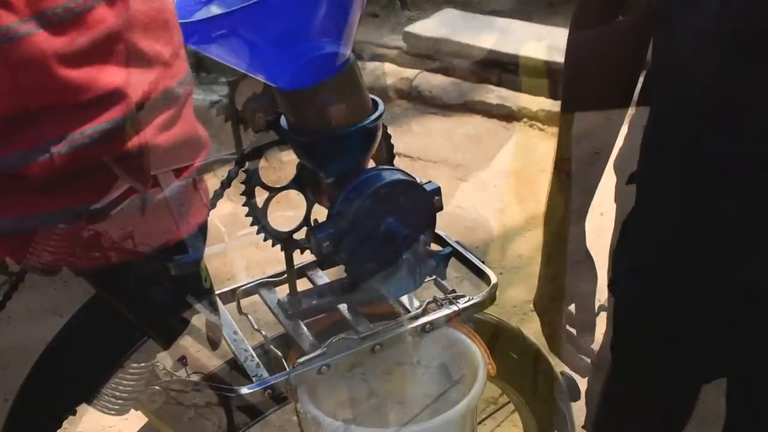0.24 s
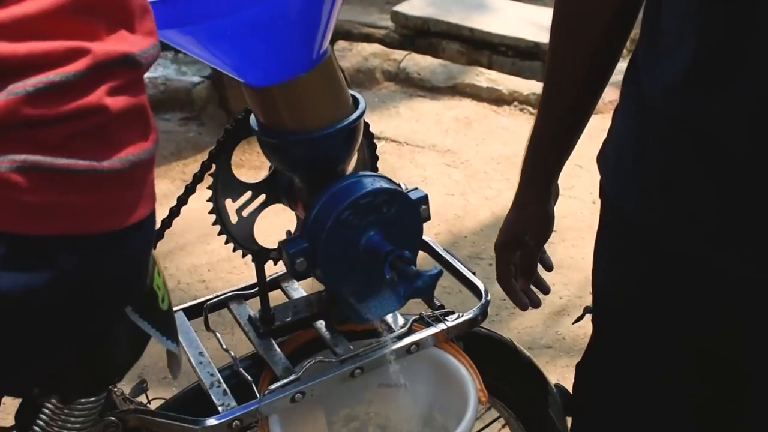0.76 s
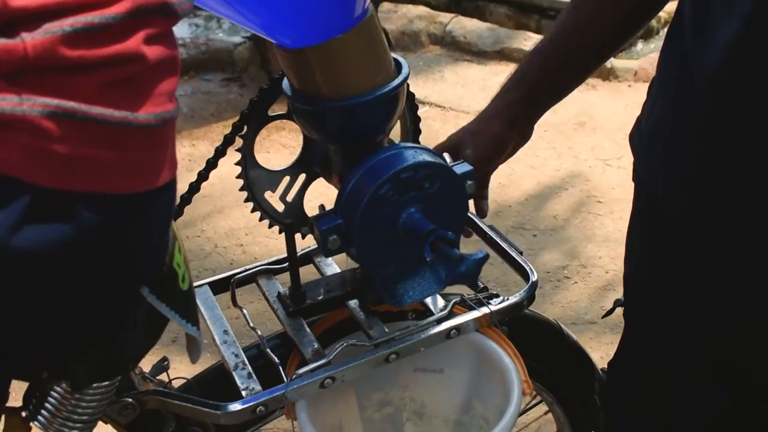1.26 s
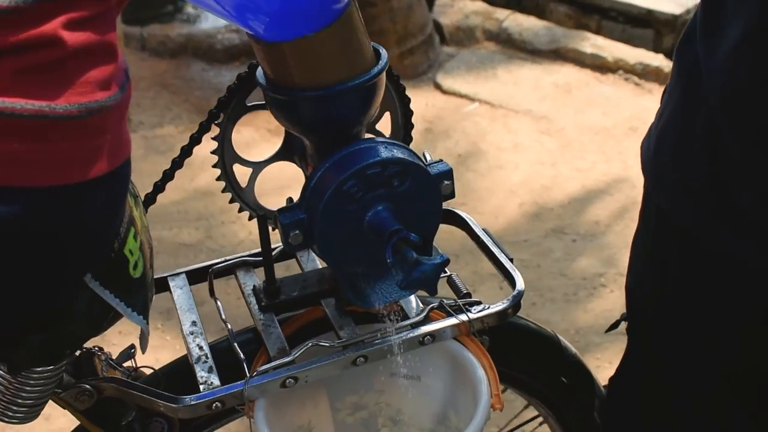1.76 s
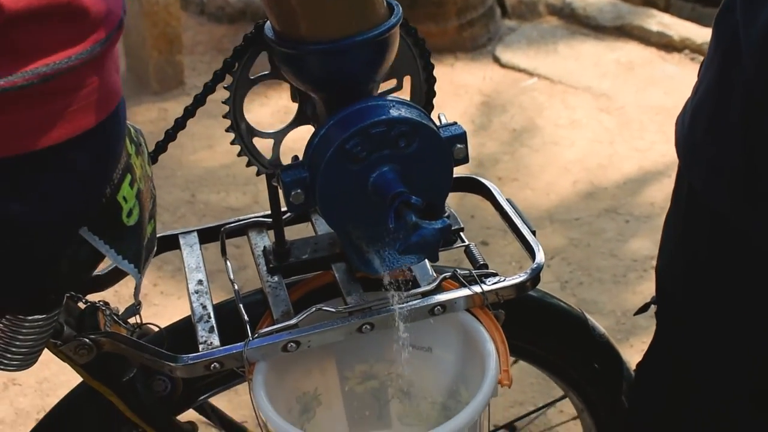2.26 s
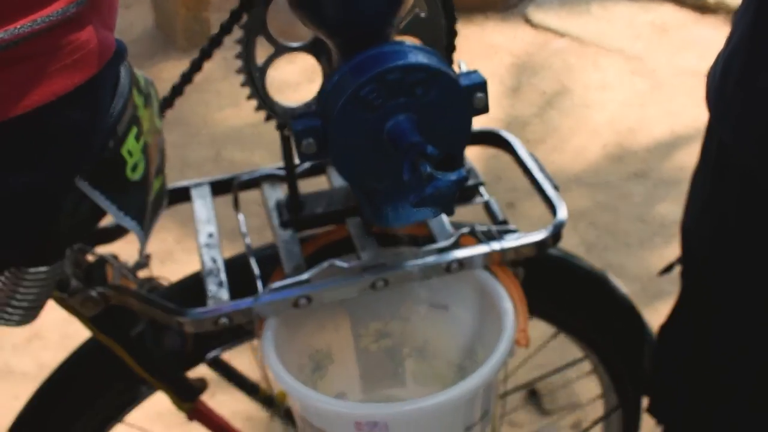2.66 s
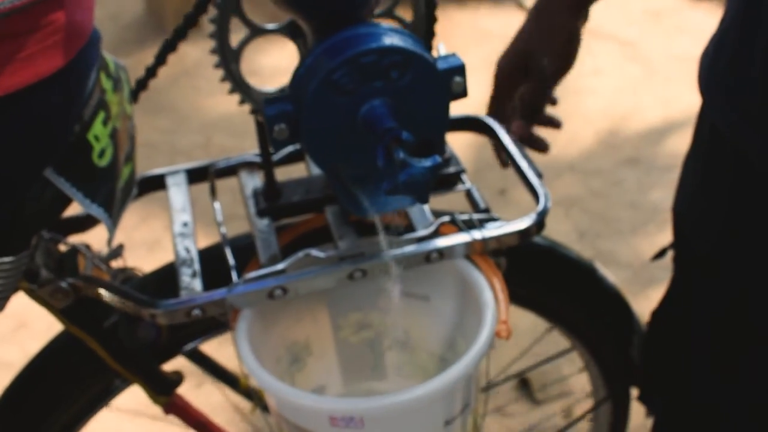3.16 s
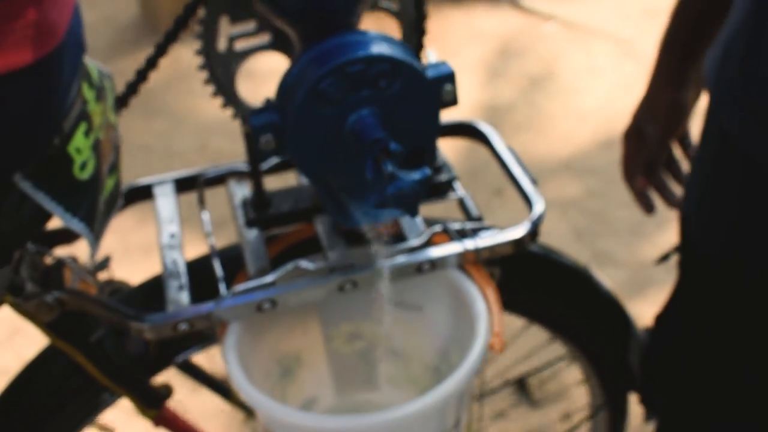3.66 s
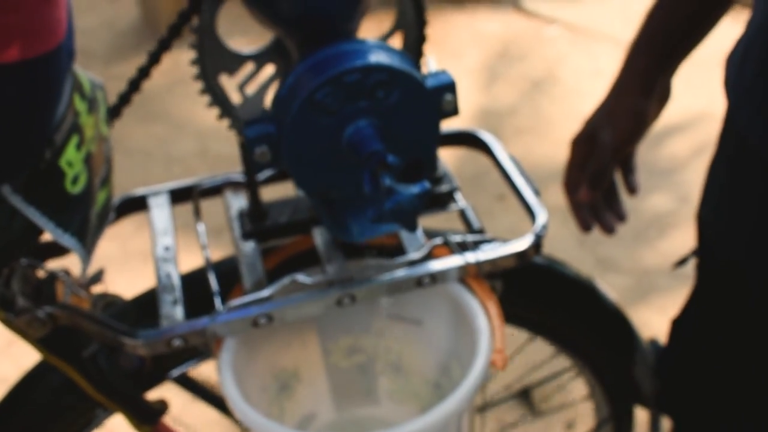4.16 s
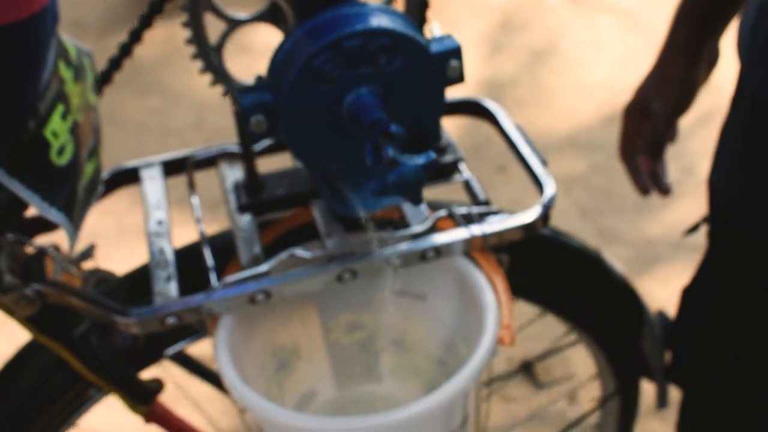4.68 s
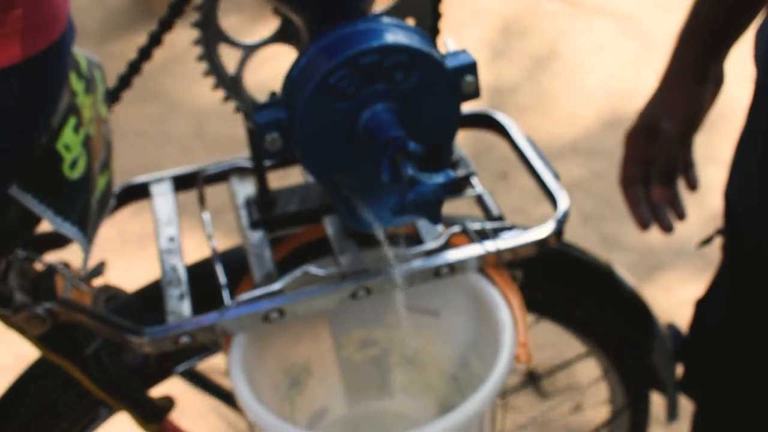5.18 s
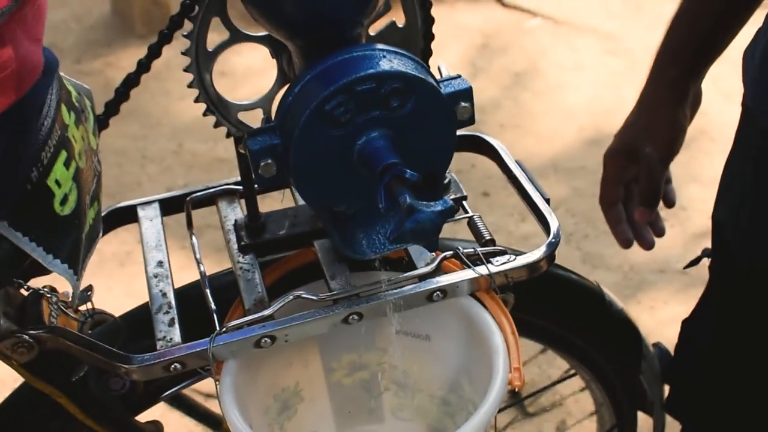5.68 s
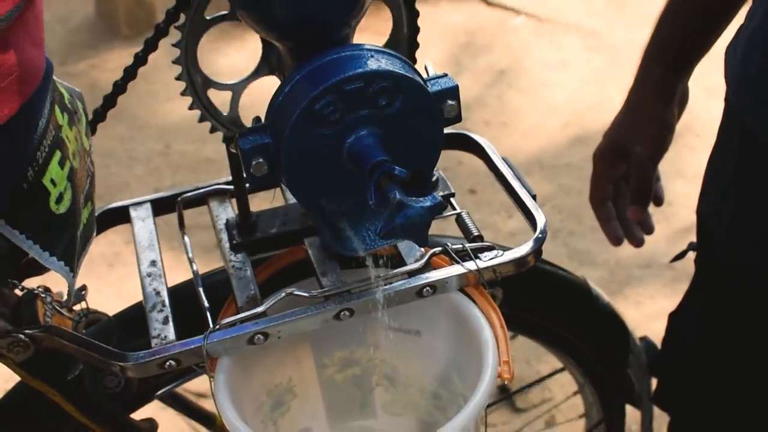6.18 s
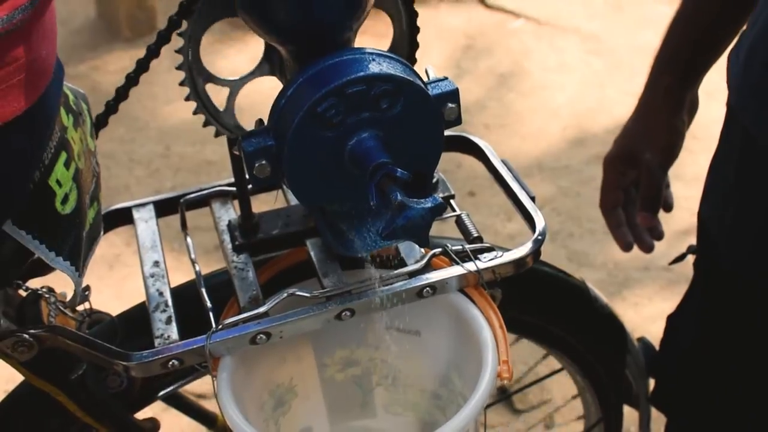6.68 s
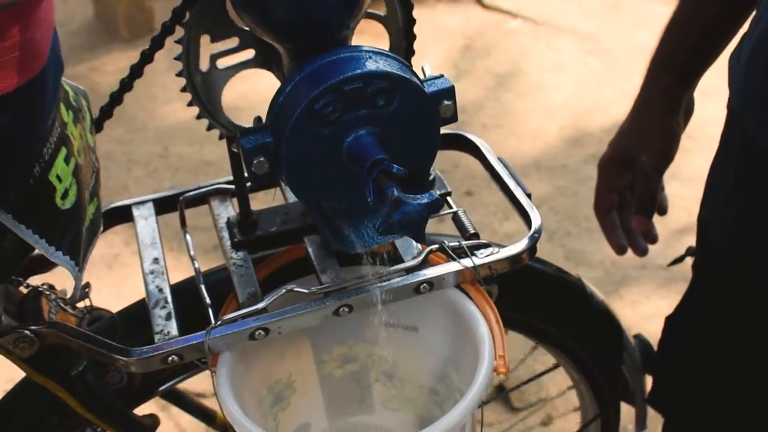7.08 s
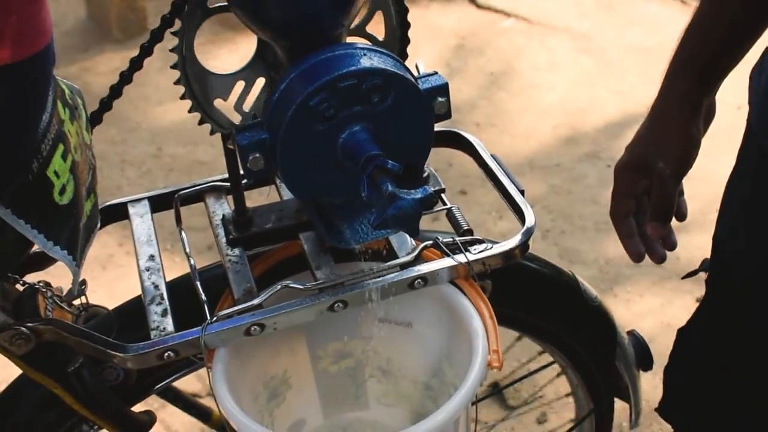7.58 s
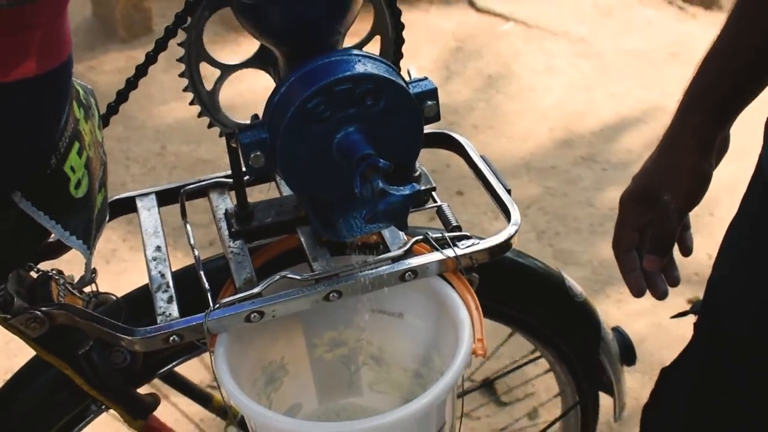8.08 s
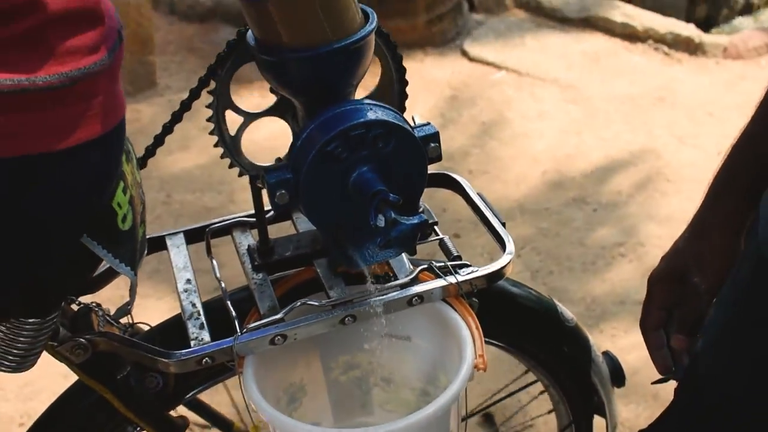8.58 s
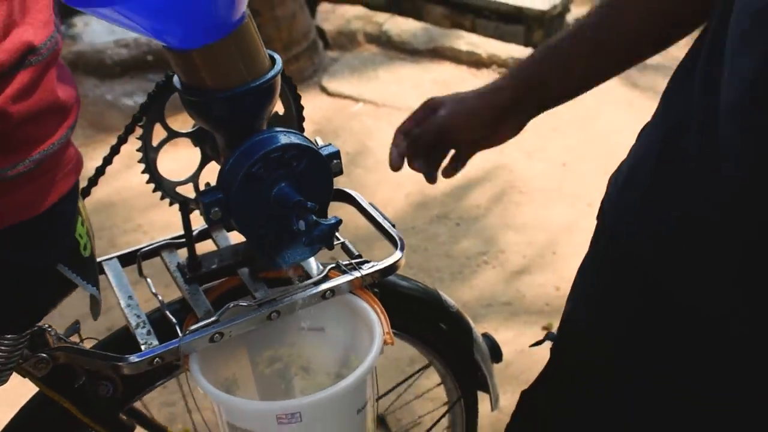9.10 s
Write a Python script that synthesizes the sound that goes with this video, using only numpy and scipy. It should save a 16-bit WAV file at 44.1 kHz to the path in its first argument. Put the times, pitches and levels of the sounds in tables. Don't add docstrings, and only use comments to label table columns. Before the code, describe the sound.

Harsh gritty iron grinding and ringing cracks surge and sag with each turn of the mill, chain ticking and bits knocking in a plastic bucket.

```python
import sys
import numpy as np
from scipy import signal
from scipy.fft import rfft, irfft
from scipy.io import wavfile
from scipy.ndimage import uniform_filter1d, minimum_filter1d, map_coordinates

SR = 44100
rng = np.random.default_rng(int(sys.argv[2]) if len(sys.argv) > 2 else 0)


def gain_from_decibels(decibels):
    exponent = np.asarray(decibels, float) / 20
    return 10 ** exponent


def unload_wav(signal):
    wavfile.write(
        sys.argv[1],
        SR,
        np.round(np.clip(np.atleast_2d(signal).T, -1, 1) * 32767).astype(np.int16),
    )


N = 412114
STEP = 4

# time in seconds, level in dB, casting boom in dB, grit brightness in dB.
EFFORT = [(0, -18, -2, 0), (0.25, -15.5, 0, -0.5), (0.75, -16, -1, 2), (1.3, -20.5, -0.5, -1),
          (1.55, -13.5, -0.5, -3), (2.1, -15.5, 1, -3), (2.39, -15, 0, -3), (2.99, -14, -1, 1.5),
          (3.6, -13.5, 1.5, -1), (3.92, -15, -2.5, 0.5), (4.6, -17.5, 1, -2), (5.2, -13.5, 1, -4),
          (6.1, -20.5, 0.5, 1.5), (6.6, -15, 1.5, 0), (7.4, -17, -1, -1.5), (7.8, -16.5, -2.5, -3.5),
          (8.7, -17.5, -0.5, -1.5), (9.34, -21, 0, 2)]
# start in seconds, fall in seconds, hold in seconds, rise in seconds, depth in dB.
LULLS = [(0.0, 0.038, 0.13, .03, 6.5), (0.79, .22, 0.16, .04, 13), (1.59, 0.096, .03, 0.12, 5.5),
         (2.414, 0.19, .06, .28, 13), (3.12, 0.13, 0.035, 0.024, 4), (3.95, 0.1, .16, 0.078, 15.5),
         (4.264, 0.025, .03, .03, 5), (5.36, 0.16, .03, 0.058, 2.5), (5.522, 0.062, 0.12, .16, 14.5),
         (6.433, .05, .02, 0.13, 2.5), (7.456, .11, 0.017, 0.088, 10), (7.957, 0.034, 0.041, 0.23, 5.5),
         (8.798, 0.24, 0.054, .05, 3.5), (9.081, 0.034, 0.078, 0.083, 12.5)]
# time in seconds, level
# in dB, boom in dB.
KERNEL_SPLITS = [(0.095, -11, -6), (0.2615, -20, -14), (2.2869, -3.5, 1), (2.3834, -3.5, -19),
                 (2.6729, -6, -3), (2.8663, -3, -5), (3.306, -1, -6), (3.4418, -3, 0), (3.4723, 0, -13),
                 (3.6342, 0, -2), (3.6837, -1, -2), (3.8322, -8, 5), (4.2649, -2.5, -4), (4.558, -3, -5),
                 (4.8588, -3, 4), (4.9618, -6, -3), (5.0363, -12, -9), (5.2051, -3, -18), (5.2267, 0.5, 5),
                 (5.389, -4, 5), (5.9811, -1.5, -0.5), (5.9953, -1.5, 1), (6.2389, -1.5, 0.5),
                 (6.3256, 1, -0.5), (6.8287, -2, 3), (7.0395, -4, -1), (7.3729, -3, -1.5), (7.732, -5.5, 1),
                 (7.9809, -6.5, 8.5), (8.5885, -1, 2),
                 (0.689, -3, -9), (0.9233, -10, -4.5), (1.1048, -12.5, -16), (1.1952, -15, 1), (1.2593, -14, 10),
         (1.522, -12, 15), (1.6095, -4, 2), (1.7594, -5.5, 1), (1.795, -8, 3), (2.7358, -11, 6),
         (2.8162, -5.5, -3), (4.0074, -9, -0.5), (4.0842, -14, -10), (4.2152, -11, -11), (4.3493, -9, 6),
         (4.4062, -10, 4.5), (4.5392, -3, -6), (5.53, -10, -4), (5.8587, -14, 1), (6.075, -7.5, -7),
         (6.1385, -9, 1.5), (6.2731, -8, 0), (6.5742, -9, -16), (7.1574, -7, 3.5), (7.6244, -6.5, -9),
         (8.1924, -4, -7), (8.242, -6, -6), (8.348, -5.5, -15), (9.0809, -14, -8), (9.218, -7.5, -7),
                 (2.1436, -9, 6), (2.2785, -10, -5), (2.4249, -11, -2), (2.4388, -5, -15), (3.5624, -12, 8),
              (3.6728, -4, 1.5), (3.8133, -7, 1), (3.913, -4, -2), (3.9298, -4.5, 1), (4.2499, -7, -2),
              (4.383, -11, 4), (4.7164, -6.5, 1), (4.814, -7, 8), (5.2196, -3, -3), (5.4383, -9.5, -1),
              (5.7834, -15, -3), (6.6022, -13, -6), (7.3924, -3.5, 2.5), (7.4456, -8, 2.5),
              (7.6637, -13.5, 0), (7.8576, -9, 8), (7.881, -10, 8), (7.9058, -8, 8), (8.258, -10, -5),
              (8.4613, -12.5, 8), (8.7291, -5, -2), (8.7842, -9, 1.5), (8.9758, -8, 2), (9.1132, -14, 5),
              (9.282, -11, -8)]
# time in seconds, level in dB, boom in dB.
CRUMBLES = [(0.1459, -1.5, -7), (0.7617, -9, -4), (0.7795, 6, -10), (1.2068, -9, -1), (1.2327, -14.5, -9),
            (1.298, -11.5, -5), (1.3528, -9.5, 3.5), (1.4539, -8.5, 1), (2.2012, -6.5, 1.5),
            (2.7824, -6, -2.5), (3.1358, -11, -9), (3.2923, -3, 3), (3.3263, -6, 1), (3.3619, -3.5, -7),
            (3.3974, -4.5, -6), (3.6195, -5, 2.5), (3.9006, -6, -4), (4.2344, -6.5, 1.5),
            (4.4863, -4.5, -1), (4.9486, -6.5, -2), (5.8482, -9, -4), (6.149, -7.5, -2.5), (6.311, -5, -10),
            (6.3389, -3, -2), (6.7084, -7.5, 1), (7.2261, -7, -4), (7.7822, -3.5, -6), (7.9468, -4.5, -2.5),
            (8.7032, -7, 2.5), (8.9332, -6.5, -6)]
# pitch in Hz, width in Hz, level over the burr spectrum in dB.
IRON = np.array([(279, 69, -1.5), (429, 19, -5.0), (610, 310, -1), (860, 165, 1.5), (1120, 98, 2.5),
        (1386, 29, -0.5), (1507, 53, 4.0), (1777, 363, 5.0), (2197, 255, 0.5), (2391, 144, 6.5),
        (2700, 354, 0.5), (3180, 260, -2.5), (3688, 265, 0.5), (4480, 456, 3.5), (4806, 108, 3.5),
        (5162, 220, 3.0), (5550, 360, 1), (6100, 140, 1.5), (6543, 376, 6.0), (7055, 147, 6.5),
        (7720, 245, 3), (8800, 900, -3.0), (9834, 450, 3.5), (10750, 330, 5), (12170, 910, 2.5),
        (14240, 360, 5.5)])
# frequency in Hz, level in dB per Hz.
BURR_TONE = [(150, -59.5), (280, -21), (600, -15.5), (1220, -13), (1320, -6), (2800, -7), (5000, -4),
             (7500, -13.5), (10000, -10.5), (12500, -17.5), (14500, -15.5), (15690, -23), (15720, -99)]
# time in seconds, level in dB.
CHATTER = [(6.708, 0), (6.781, -1), (6.806, -1), (6.829, -2), (6.868, -7), (6.94, -3)]
# time in seconds, level in dB.
OPENING_HITS = [(0.0116, -10), (0.0254, -18), (0.0605, -12.5), (0.0664, -15), (0.0784, -16), (0.087, -14),
                (0.0948, -8), (0.127, -11), (0.1471, -12), (0.1727, -5.5), (0.175, -2)]
# time in seconds, peak in dB, pitch in Hz.
KNOCKS = [(0.146, -18.5, 523), (3.294, -14, 587), (3.362, -18.5, 420), (3.515, -17, 665),
          (3.612, -16.5, 580), (3.75, -22, 638), (4.352, -21, 647), (4.376, -24, 549), (4.628, -15, 626),
          (4.746, -22, 670), (4.772, -19, 627), (4.804, -16, 630), (5.524, -22, 610), (6.079, -18.5, 630),
          (6.637, -25, 606), (6.963, -20.5, 614), (7.175, -23, 606), (7.233, -23, 603), (8.335, -25, 550),
          (8.563, -23, 711)]
# pitch in Hz, width in Hz, level in dB.
BUCKET_MODES = [
    (299, 72, 6.5),
    (420, 60, -2),
    (618, 105, 2.5),
]
# time in seconds, pitch in Hz, level in dB.
SQUEAK = [
    (8.2, 780, -60),
    (8.22, 770, -45),
    (8.255, 730, -35),
    (8.29, 650, -59),
]
# time in seconds, peak in dB.
THUMPS = [(0.78, -30), (3.293, -46), (3.442, -48), (3.562, -50), (4.814, -52), (5.205, -46), (5.981, -46),
          (6.326, -44), (6.829, -48), (8.589, -50)]
# frequency in Hz, level in dB per Hz.
YARD_TONE = [(20, -38), (90, -36), (180, -15.5), (450, -16.5), (600, -1), (1000, -3.5), (1500, -3),
             (2500, -6.5), (5000, -18.5), (9000, -13), (15680, -48), (15720, -86)]

MODE_HZ = np.transpose(IRON)[0][:, None]
MODE_INDEX = np.arange(len(IRON))[:, None]
RACK = MODE_HZ < 1250
BOOMY = abs(MODE_HZ - 2100) < 850
BRIGHT = MODE_HZ > 8200
TIP = MODE_HZ > 14000
PLATE = np.isin(MODE_INDEX, [5, 6])
OPENING_MODES = np.isin(MODE_INDEX, [10, 12])


def unit(x):
    return x / np.sqrt(np.mean(x ** 2) + 1e-20)


def along(points, hz):
    f, v = np.transpose(points)
    return np.interp(np.log(hz + 1), np.log(f + 1), v)


def wobble(rate, step=1):
    knots = rng.standard_normal(int(N * rate / SR) + 4)
    return map_coordinates(knots, [np.arange(0, N, step) * rate / SR])


def causal(x, gain):
    size = 8192
    cepstrum = irfft(np.log(gain(np.fft.rfftfreq(size, 1 / SR)) + 1e-6), size)
    cepstrum[..., 1:size // 2] *= 2
    cepstrum[..., size // 2 + 1:] = 0
    impulse = irfft(np.exp(rfft(cepstrum)), size)
    return signal.oaconvolve(x, impulse, axes=-1)[..., :N]


def resonate(x, hz, width):
    return signal.lfilter(*signal.iirpeak(hz, hz / width, SR), x)


def bursts(times, gains, t60, rise):
    rate, size = SR / STEP, -(-N // STEP)
    at = np.clip((times * rate).astype(int), 0, size - 1)
    power = np.array([np.bincount(at, g ** 2, size) for g in gains])
    swell = np.exp(-1 / (rise * rate + 0.11))
    decay = gain_from_decibels(-120 / rate / t60)
    return signal.lfilter([1 - swell], np.convolve([1, -decay], [1, -swell]), power)


def load(t):
    s, *columns = np.transpose(EFFORT)
    level_db, boom_db, grit_db = (np.interp(t, s, column) for column in columns)
    lull_db = 0
    for start, fall, hold, rise, depth_db in LULLS:
        corners = start + np.cumsum([0, fall, hold, rise])
        lull_db = lull_db + depth_db * np.interp(t, corners, [0, 1, 1, 0])
    return level_db - lull_db, boom_db, grit_db + 0.22 * lull_db


def grinding():
    level_db, boom_db, bright_db = load(np.arange(0, N, STEP) / SR)
    draws = rng.random((4200, 2 + len(IRON)))
    size_db = np.minimum(-4.5 * np.log(draws[:, 1]), 11)
    uneven_db = 10.5 * (draws[:, 2:].T - 0.5)
    snaps = bursts(draws[:, 0] * N / SR, gain_from_decibels(size_db + uneven_db), t60=0.016, rise=0.00013)
    meal = gain_from_decibels(2.0 * wobble(31, step=STEP) - 6.5) ** 2
    contact = [wobble(3, step=STEP) + 0.6 * wobble(0.8, step=STEP) for _ in IRON]
    contact_db = 2.1 * np.clip(contact, -2, 1.6)
    mix = gain_from_decibels(-2.5) ** 2 * snaps / snaps.mean() + meal
    tone_db = BOOMY * boom_db + (BRIGHT + 1.0 * TIP) * bright_db
    return mix * gain_from_decibels(level_db - 4 + contact_db + tone_db) ** 2


def kernels(table, t60, rise, gain_db):
    s, db, boom_db = np.transpose(table)
    scatter_db = np.clip(3.5 * rng.standard_normal((len(s), len(IRON))).T, -9, 5)
    tone_db = BOOMY * (boom_db + 1.0) - 6.6 * RACK - 2 * BRIGHT
    sizes = gain_from_decibels(db + gain_db + scatter_db + tone_db)
    cracks = bursts(s, sizes, t60, rise)
    splinters = bursts(s, gain_from_decibels(-16.0) * sizes, t60=0.052, rise=0.0015)
    return cracks + splinters


def ordinary(count):
    late, size, boom = rng.standard_normal((3, count, 3)).reshape(3, -1)
    clump_s = np.repeat(rng.random(count), 3) * N / SR
    s = clump_s + 0.03 * late
    level_db = load(s)[0] + 5 + 2.5 * np.clip(size, -2, 0.8)
    boom_db = -1.5 + 4.6 * np.clip(boom, -3, 1)
    return np.transpose([s, level_db, boom_db])


def chatter():
    s, db = np.transpose(CHATTER)
    return PLATE * bursts(s, gain_from_decibels([db]), t60=0.081, rise=0.0011)


def opening_hits():
    s, db = np.transpose(OPENING_HITS)
    return OPENING_MODES * bursts(s, gain_from_decibels([db + 8]), t60=0.012, rise=0.00037)


def casting(power):
    envelope = np.repeat(np.sqrt(np.abs(power)), STEP, axis=1)[:, :N]
    force = envelope * rng.standard_normal(N)
    rings = sum(gain_from_decibels(db) * resonate(f, hz, width) for f, (hz, width, db) in zip(force, IRON))
    direct = 0.12 * force[[6, 14, 22]].sum(0)
    return causal(rings + direct, lambda hz: gain_from_decibels(along(BURR_TONE, hz) + 7.5))


def chain():
    rate, ring_hz, width_hz = 42, 12700, 1800
    count = int(N / SR * rate)
    jitter, size = rng.standard_normal((2, count))
    times = (np.arange(count) + 0.095 * jitter) / rate
    level_db = -26.5 + 3.5 * np.clip(size, -3, 1.2)
    power = bursts(times, gain_from_decibels([level_db]), t60=0.014, rise=0.0005)
    ticks = np.repeat(np.sqrt(np.abs(power[0])), STEP)[:N] * rng.standard_normal(N)
    return resonate(resonate(ticks, ring_hz, width_hz), ring_hz, width_hz)


def bucket():
    out, t = np.zeros(N + SR), np.arange(SR // 10) / SR
    onset = 1 - np.exp(-t / 0.0061)
    for s, peak_db, pitch in KNOCKS:
        ring = 0
        for hz, width, db in BUCKET_MODES:
            off_pitch_db = 18 * abs(np.log2(hz / pitch))
            decay_db = 23.8 * width * t
            ring = ring + gain_from_decibels(db - off_pitch_db - decay_db) * np.sin(2 * np.pi * hz * t)
        out[round(s * SR):][:len(t)] += gain_from_decibels(peak_db + 4.5) * ring * onset
    return out[:N]


def squeak():
    s, hz, db = np.transpose(SQUEAK)
    t = np.arange(N) / SR
    level_db = np.interp(t, s, db, -150, -150)
    phase = 2 * np.pi * np.cumsum(np.interp(t, s, hz)) / SR
    return gain_from_decibels(level_db) * np.sin(phase)


def thumps():
    out, u = np.zeros(N), np.arange(SR // 50) / SR / 0.00088
    for s, db in THUMPS:
        out[round(s * SR):][:len(u)] += gain_from_decibels(db) * u * np.exp(1 - u)
    return out


def yard():
    hiss = causal(rng.standard_normal(N), lambda hz: gain_from_decibels(along(YARD_TONE, hz)))
    return gain_from_decibels(-39.5 + 2.2 * wobble(2.45)) * unit(hiss)


def scene():
    hard = np.array(KERNEL_SPLITS)
    soft = np.vstack([CRUMBLES, ordinary(count=14)])
    splits = kernels(hard, t60=0.0036, rise=0.00034, gain_db=0.5)
    crumbles = kernels(soft, t60=0.024, rise=0.0017, gain_db=-3.0)
    crackle = kernels(ordinary(count=130), t60=0.0025, rise=0.0001, gain_db=1.5)
    mill = casting(grinding() + splits + crumbles + crackle + opening_hits() + chatter())
    return (mill + chain() + bucket() + squeak() + thumps() + yard())[None]


def band_limit(x):
    return signal.sosfilt(signal.butter(12, 15700, fs=SR, output="sos"), x)


def record(dry):
    need = np.minimum(1, 1.08 / (np.abs(dry) + 1e-9))
    gain = uniform_filter1d(minimum_filter1d(need, size=41), size=31)
    return band_limit(dry * gain)


dry = scene()
out = record(dry)
unload_wav(out)
```